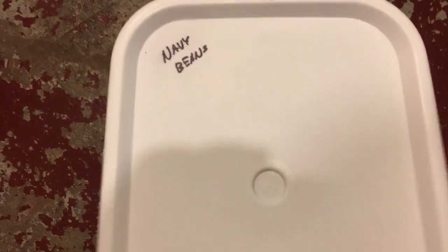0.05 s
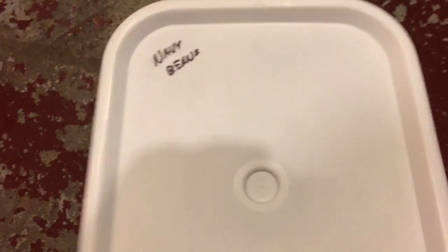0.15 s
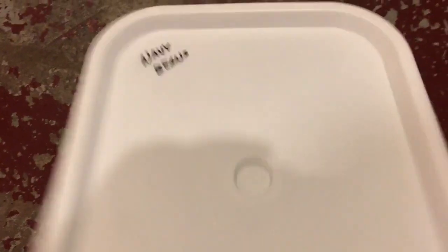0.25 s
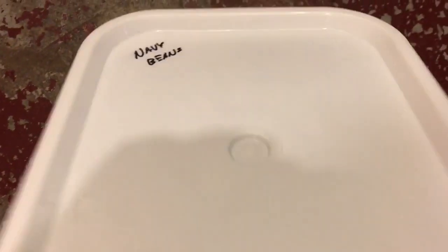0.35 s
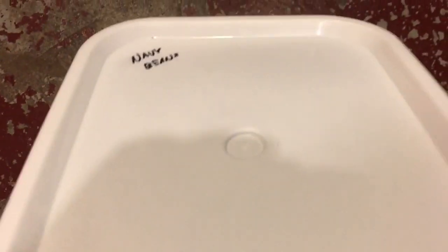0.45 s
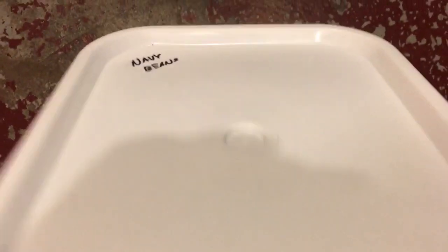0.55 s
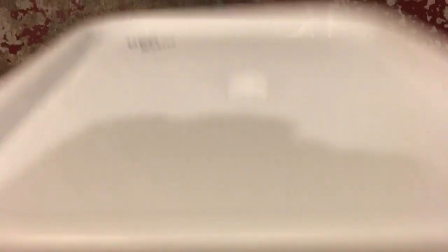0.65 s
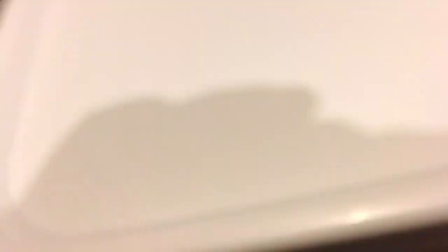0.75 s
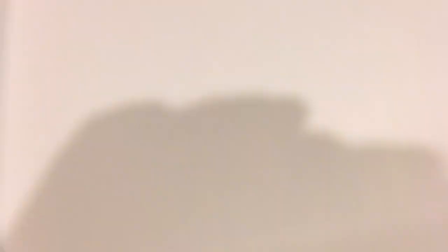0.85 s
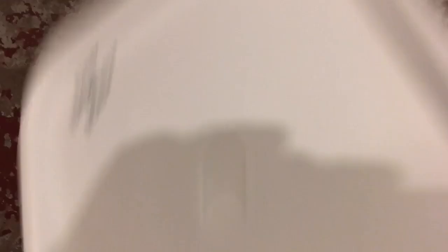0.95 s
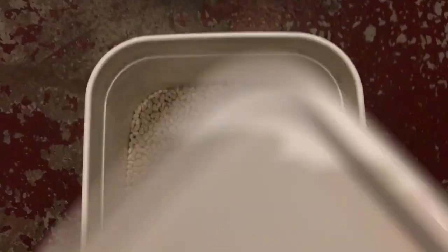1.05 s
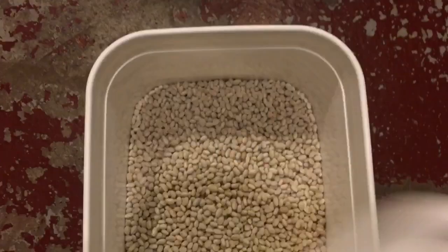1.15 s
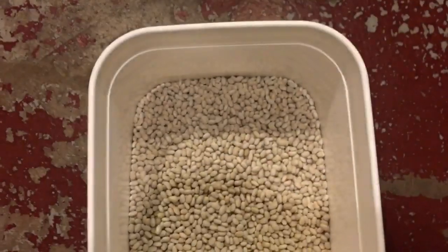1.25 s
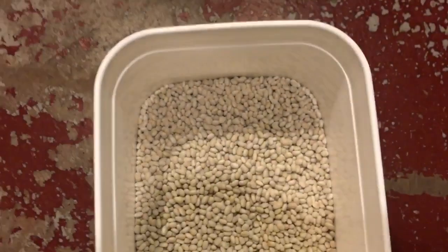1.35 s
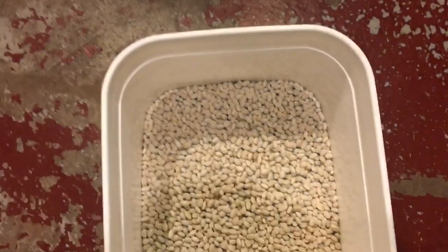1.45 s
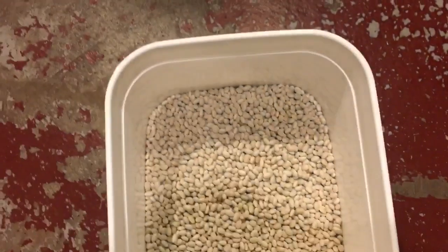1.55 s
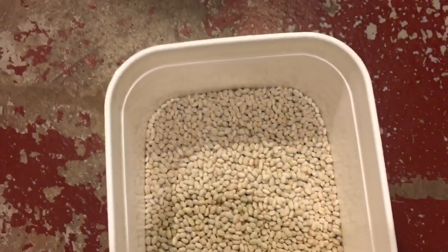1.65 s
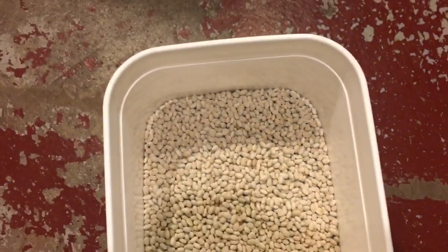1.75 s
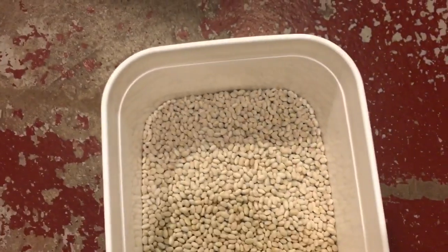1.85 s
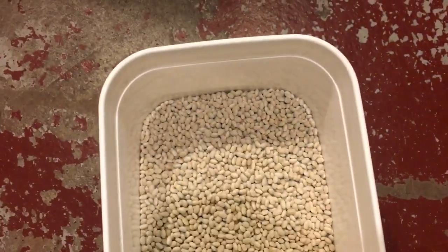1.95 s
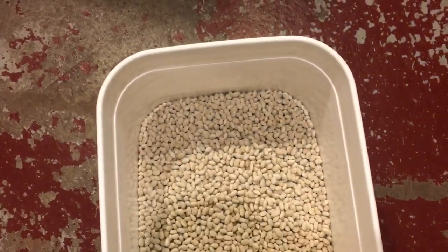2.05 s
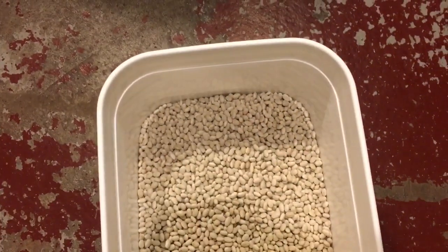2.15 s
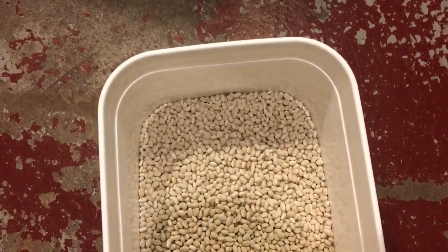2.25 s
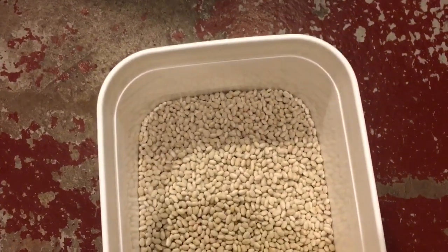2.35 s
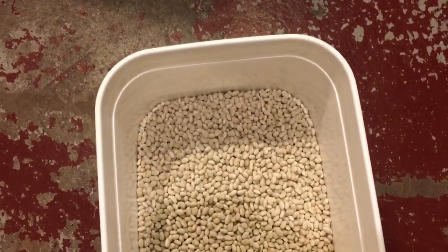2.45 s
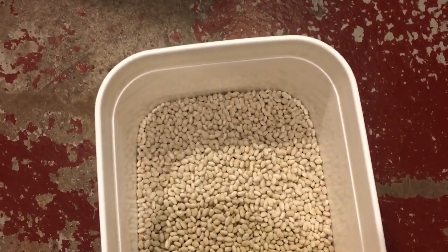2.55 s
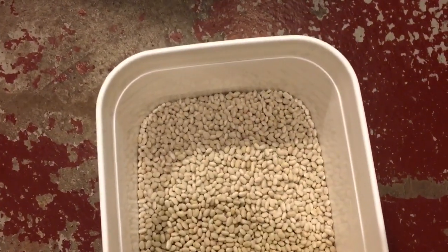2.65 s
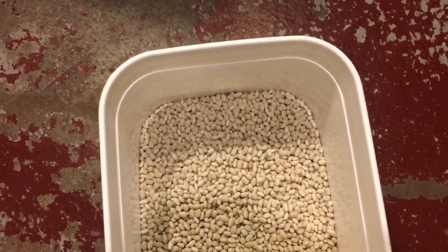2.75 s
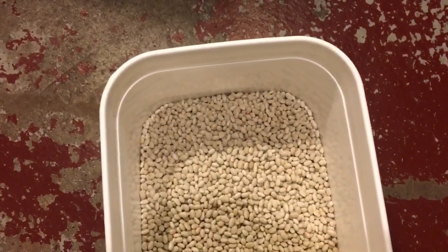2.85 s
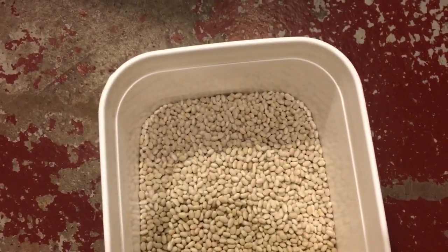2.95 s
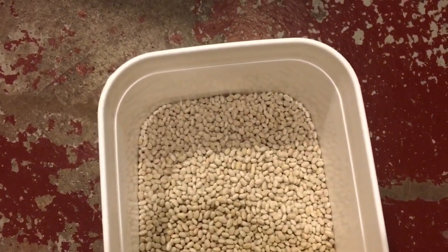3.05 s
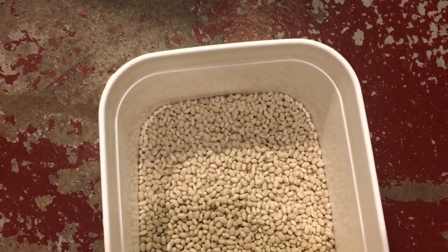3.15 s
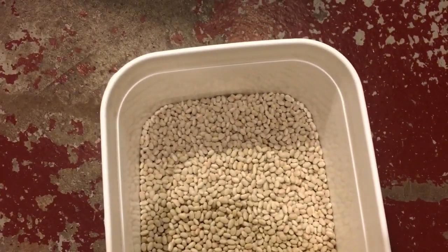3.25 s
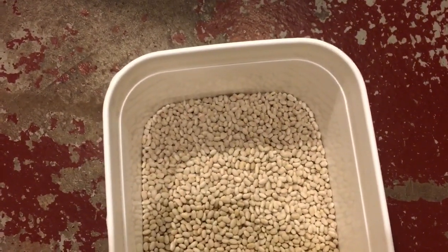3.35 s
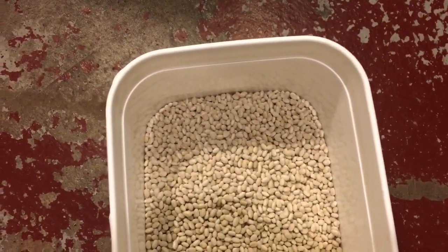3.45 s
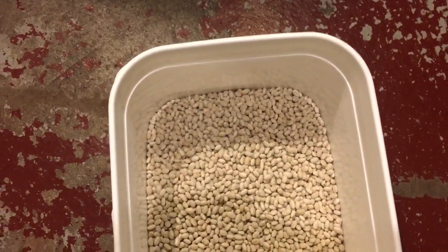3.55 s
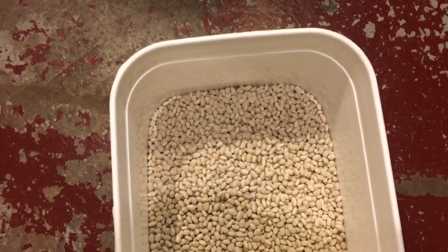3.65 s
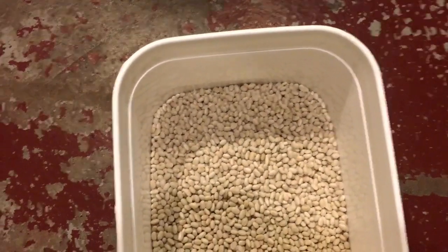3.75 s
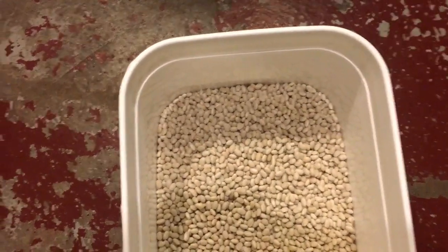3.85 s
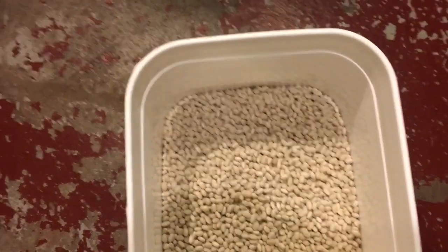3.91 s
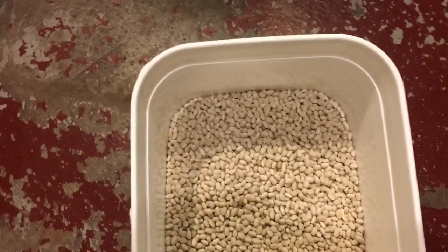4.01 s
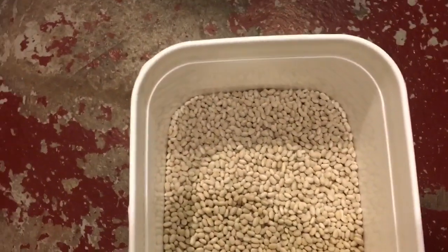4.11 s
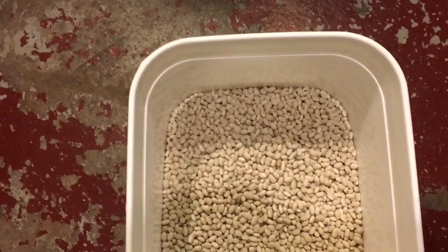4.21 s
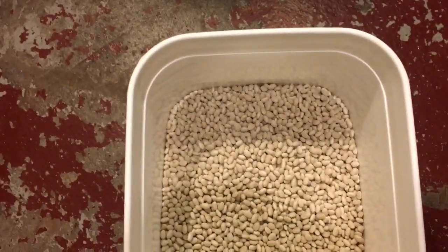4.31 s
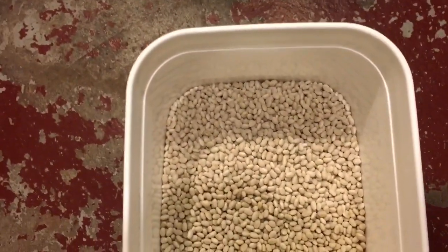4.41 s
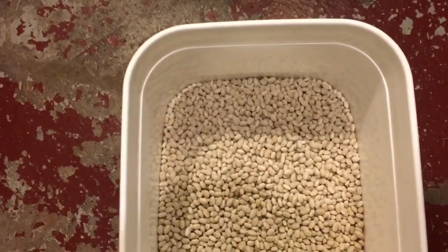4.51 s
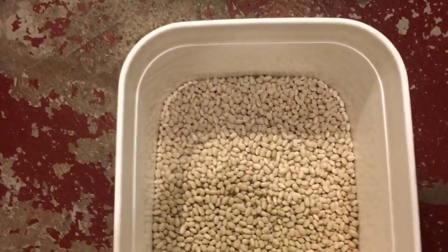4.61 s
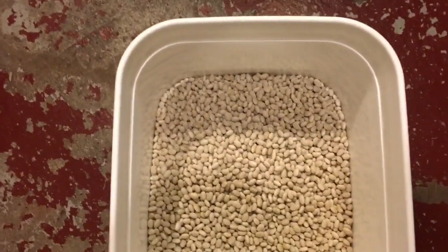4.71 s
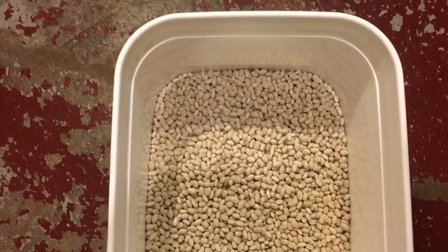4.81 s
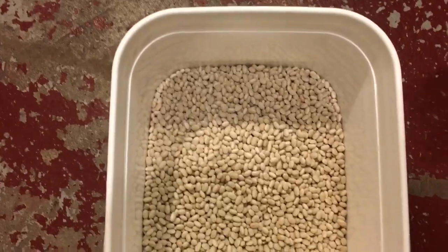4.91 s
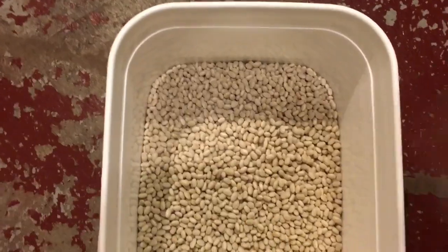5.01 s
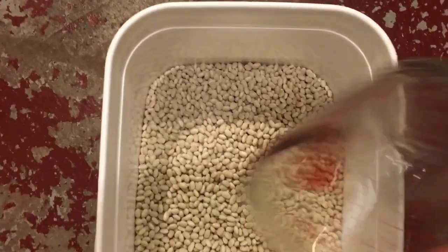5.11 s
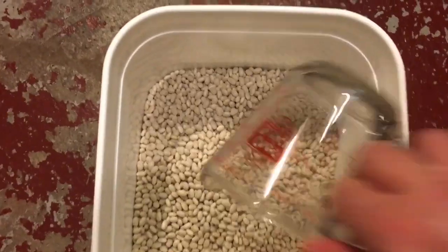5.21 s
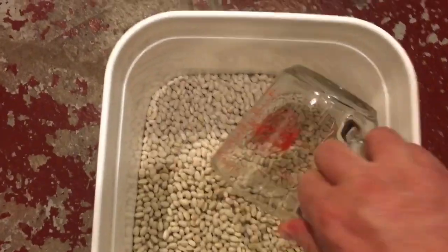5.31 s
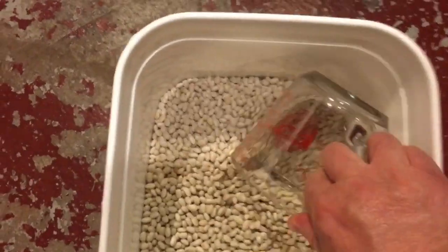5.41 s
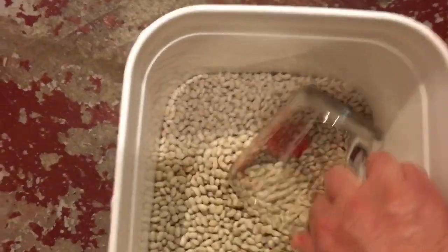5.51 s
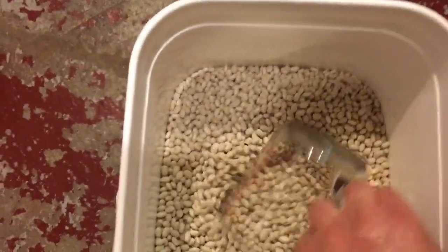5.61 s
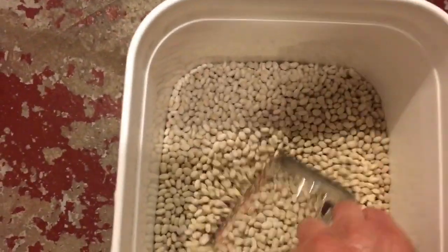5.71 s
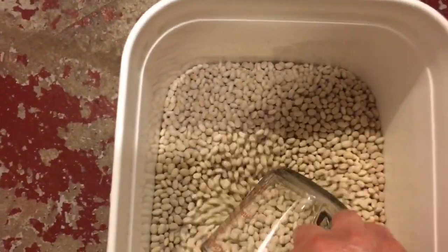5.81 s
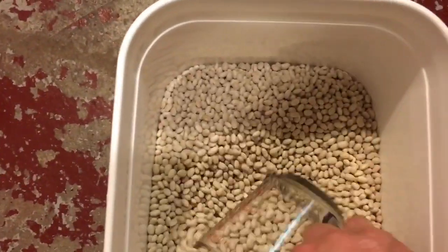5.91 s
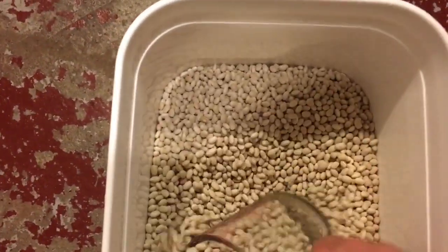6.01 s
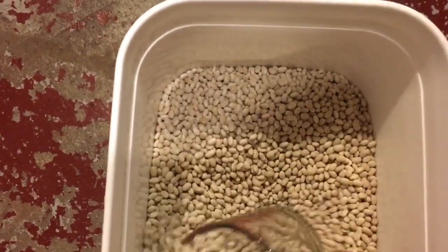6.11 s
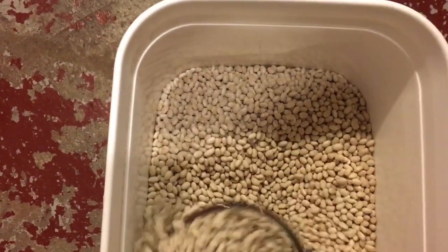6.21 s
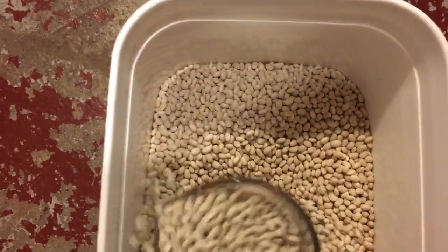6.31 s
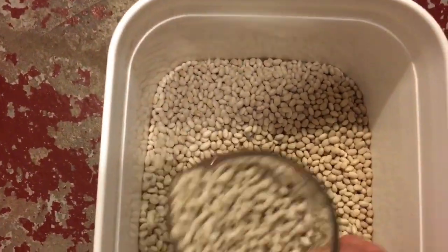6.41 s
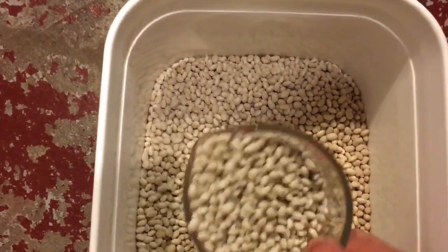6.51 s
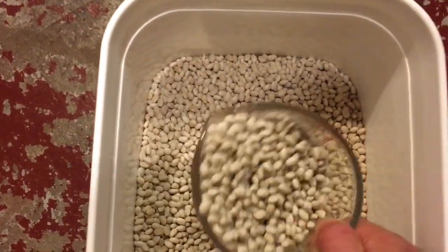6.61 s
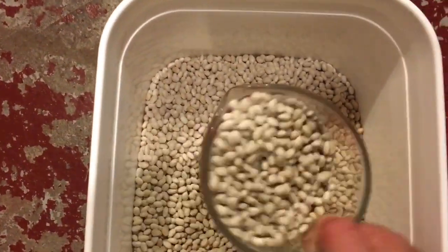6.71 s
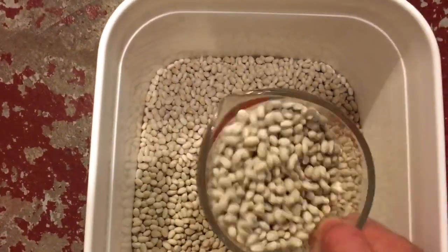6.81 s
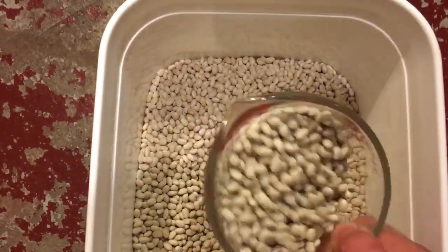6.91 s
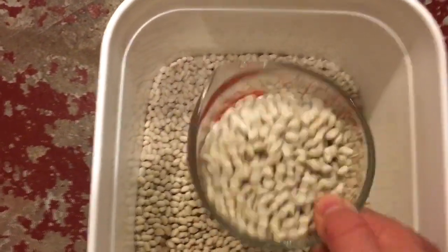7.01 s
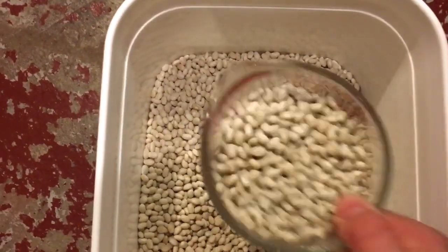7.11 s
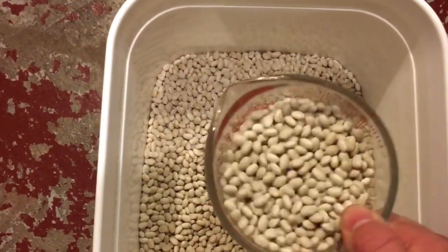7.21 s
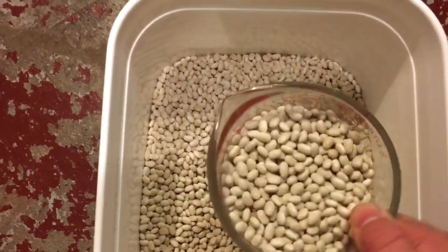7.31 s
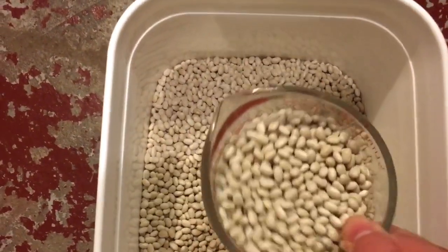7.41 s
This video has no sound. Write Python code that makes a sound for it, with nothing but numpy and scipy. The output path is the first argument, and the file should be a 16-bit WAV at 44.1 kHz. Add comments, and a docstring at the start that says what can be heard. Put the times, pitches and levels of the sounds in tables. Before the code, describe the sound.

A snap-on lid is pried off a plastic tub with a quick run of loud, hollow pops and knocks. It is laid aside with softer scuffs, bumps and creaks while a sleeve rustles. After a pause, a glass cup digs into dry beans, which clatter and ring against it. Stray beans tick down as the cup is gently shaken. The microphone is close, in a room with a faint hum.

```python
"""Scooping dry beans from a plastic tub

A small microphone close to the tub, in a room with a mains hum. The snap-on lid pops off, ringing and
booming, and is laid aside with scuffs, bumps and creaks while a sleeve rustles. A glass cup digs in and
is dragged through the beans: countless tiny contacts clatter, ring the glass and thrum in the tub walls.
The cup lifts full, sheds stray beans and is shaken level."""
import sys
import numpy as np
from scipy import signal
from scipy.fft import rfft, irfft
from scipy.io import wavfile
from scipy.ndimage import uniform_filter1d

SR = 44100
rng = np.random.default_rng(int(sys.argv[2]) if len(sys.argv) > 2 else 0)


def master(y):
    """Save y as 16-bit WAV."""
    cut = np.clip(np.atleast_2d(y).T, -1, 1)
    pcm = np.round(cut * 32767)  # scale
    wavfile.write(sys.argv[1], SR, pcm.astype(np.int16))


N = 328986

# spectrum of sliding friction: frequency_hz, density_db
FRICTION = [(120, -45), (200, -9.5), (829, -12.5), (1200, -7), (1390, -11.5), (1550, -3.5), (2150, -6.5),
            (2960, -14.5), (4970, -13.5), (6550, -13.5), (7460, -19.5), (15300, -25.5), (16500, -51)]
# spectrum of bean striking bean: frequency_hz, density_db
BEAN_CLATTER = [(60, -65), (180, -37), (300, -31), (627, -9), (694, -20.5), (1060, -7.5), (1380, -3.5),
                (1690, -4), (2030, 1), (4030, -14.5), (4770, -16), (6030, -13), (8580, -18), (11800, -26),
                (15200, -28), (16500, -41.5)]
# spectrum of the tub walls under the shifting load: frequency_hz, density_db
WALL_THRUM = [(55, -55), (105, -10), (180, -2), (349, -4), (423, -1), (519, -5), (864, -5.5), (1200, -14.5),
              (1560, -47), (2640, -120)]
# the cup plunges, drags, scoops and lifts out: time_s, level_db, ring_over_clatter_db
SCOOP = [(5.435, -28.5, 19.5), (5.442, -20, 27), (5.459, -23, 28), (5.474, -25.5, 16.5), (5.53, -33, 11),
         (5.57, -33.5, 9), (5.69, -26, 14), (5.84, -31, -6.5), (5.875, -36, -4), (5.93, -37.5, 2),
         (5.96, -35.5, 0.5), (6.029, -28, -24), (6.2, -25, -16), (6.31, -25, -11), (6.4, -31, 0),
         (6.51, -36, -6), (6.59, -43, 2), (6.64, -53.5, -2), (6.75, -56, 7), (6.85, -59.5, -7)]
# the full cup is shaken level: start_s, swell_s, slide_s, peak_db, rest_db
CUP_SHAKES = [(6.871, 0.038, 0.011, -39, -59), (6.985, 0.071, 0.13, -39.5, -59),
              (7.24, 0.079, 0.023, -48, -64)]
DIG_S, LIFTED_S = SCOOP[0][0], SCOOP[-1][0]


def gain_of(db):
    return 10 ** (np.asarray(db) / 20)


def unit_rms(x):
    return x / np.sqrt(np.mean(x ** 2) + 1e-20)


def unit_peak(x):
    return x / abs(x).max()


def spectrum_db(points, hz):
    corner_hz, db = np.transpose(points)
    return np.interp(np.log(hz + 1), np.log(corner_hz + 1), db)


def octaves(hz):
    return np.log2(np.maximum(hz, 100) / 3000)


def add(mix, start_s, sound):
    part = mix[max(round(start_s * SR), 0):][:len(sound)]
    part += sound[:len(part)]


def coloured(x, shape, tilt=0):
    """Minimum-phase filter of unit energy: a spectrum shape, tilted in dB per octave."""
    hz = abs(np.fft.fftfreq(4096, 1 / SR))
    log_gain = np.log(gain_of(np.maximum(spectrum_db(shape, hz) + tilt * octaves(hz), -100)))
    taps = np.fft.ifft(np.exp(np.conj(signal.hilbert(log_gain)))).real[:2048]
    return signal.oaconvolve(x, taps / np.linalg.norm(taps))[:len(x)]


def played(x, times, db, tilt):
    """Level and tilt follow curves in time; the tilt keeps the power above 1 kHz."""
    hz, t, frames = signal.stft(x, SR, nperseg=256)
    slope = gain_of(np.outer(octaves(hz), np.interp(t, times, tilt)))
    power = (abs(frames[6:]) ** 2).mean(1, keepdims=True)
    slope /= np.sqrt((power * slope[6:] ** 2).sum(0) / power.sum())
    out = signal.istft(frames * slope, SR, nperseg=256)[1][:N]
    return out * gain_of(np.interp(np.arange(N) / SR, times, db, -150, -150))


def clicks(per_s, spread_db):
    """Contacts at random moments; a few are large."""
    size = gain_of(spread_db * np.minimum(rng.exponential(1, N), 5)) * rng.choice([-1., 1.], N)
    return unit_rms(size * (rng.random(N) < per_s / SR))


def burst(noise, shape, tilt, rise_s, t60):
    """Coloured noise that swells, then dies."""
    t = np.arange(len(noise)) / SR
    swell = np.minimum(t / max(rise_s, 1e-4), 1)
    decay = gain_of(-60 * np.maximum(t - rise_s, 0) / max(t60, 1e-3))
    return coloured(noise, shape, tilt) * swell * decay / 2


def mode(hz, width_hz, db):
    """One resonance set off by a click."""
    t = np.arange(2048) / SR
    return gain_of(db) * np.sqrt(width_hz) * np.exp(-np.pi * width_hz * t) * np.sin(2 * np.pi * hz * t)


def boom(t, hz, db, t60):
    """One low mode with a soft start."""
    return gain_of(db - 60 * t / t60) * np.sin(2 * np.pi * hz * t) * (1 - np.exp(-t / 0.0049))


def patches(count, spread_db, span=1300):
    """A gain that wanders over about `span` samples."""
    return gain_of(spread_db * unit_rms(uniform_filter1d(rng.standard_normal(count), size=span)))


def struck(train, sounds, patchy_db, span=1300):
    """From just before the dig, each click sets off one of the sounds; each comes and goes in patches."""
    start = int(DIG_S * SR) - 2048
    count = N - start
    pick, out = rng.integers(0, len(sounds), count), np.zeros(N)
    for k, sound in enumerate(sounds):
        hits = train[start:] * (pick == k) * patches(count, patchy_db, span)
        out[start:] += signal.oaconvolve(hits, sound)[:count]
    return out / np.std(out[start:])


def room_tone():
    """Low rumble of the air, room and microphone hiss, and a mains hum that wavers in level."""
    # both spectra: frequency_hz, density_db
    rumble = [(30, -19.5), (50, -6.5), (80, -15.5), (160, -16), (250, -22.5)]
    hiss = [(500, -32), (1000, -35), (2000, -35), (3200, -43), (5000, -44), (8000, -48), (15500, -51)]
    hum_hz, hum_db, above_1khz_db = 121.4, -60, -72.3
    hz, t = np.fft.rfftfreq(N, 1 / SR), np.arange(N) / SR
    spectrum = rfft(rng.standard_normal(N)) * gain_of(spectrum_db(rumble + hiss, hz))
    noise = irfft(spectrum, N) / np.std(irfft(spectrum * (hz > 1000), N))
    waver = sum(np.sin(2 * np.pi * (f * t + rng.random())) / np.sqrt(f) for f in np.geomspace(.3, 8, 20))
    hum = np.sqrt(2) * gain_of(hum_db + .7 * unit_rms(waver)) * np.sin(2 * np.pi * hum_hz * t)
    return gain_of(above_1khz_db) * noise + hum


def reflections(x):
    """Sparse echoes of random sign from tub, floor and near walls; treble dies sooner."""
    taps = np.zeros(SR // 2)
    slots = np.arange(100, len(taps) - 20, 20)
    taps[slots + rng.integers(0, 20, slots.shape)] = rng.choice([-1., 1.], slots.shape)
    hz, t, frames = signal.stft(taps, SR, nperseg=128)
    t60 = 0.11 * gain_of(-.4 * octaves(hz))[:, None]
    tail = signal.istft(frames * gain_of(-60 * t / t60), SR, nperseg=128)[1]
    return signal.fftconvolve(x, tail / np.linalg.norm(tail))[:N]


def sleeve_rustle():
    """Sleeve and hand slide with fine, nearly smooth friction."""
    # time_s, level_db, tilt_db_per_octave
    slides = [(0, -42, -4.5), (.065, -74.5, -0.5), (.3, -46.5, -5), (.43, -68.5, 3), (.62, -62.5, 1),
              (1.1, -63, 1.5), (1.2, -75, -0.5), (1.61, -61, 1), (1.7, -75.5, 1.5), (1.86, -67.5, 0.5),
              (1.915, -59.5, 3.5), (1.956, -68.5, 1), (1.991, -53.5, 6.5), (2.13, -61.5, 7.5),
              (2.343, -64.5, -0.5), (2.8, -66.5, -2), (3.05, -75.5, 3), (3.15, -96, -4), (5.02, -89, -2),
              (5.17, -72.5, 0), (5.432, -66.5, 0)]
    return played(coloured(clicks(per_s=9900, spread_db=3.4), FRICTION), *np.transpose(slides))


def plastic_creaks():
    """Swelling friction feeds a single mode as the lid settles, and later as a hand brushes the tub."""
    # start_s, swell_s, level_db, pitch_hz, width_hz, t60_s
    creaks = [(2.54, 0.0056, -56, 2100, 250, 0.095), (2.558, 0.0081, -34.5, 268, 89.4, 0.14),
              (2.595, 0.047, -39, 265, 110, 0.17), (2.645, 0.011, -39.5, 2000, 250, 0.1),
              (2.649, 0.01, -43.5, 1430, 90, 0.17), (2.717, 0.0026, -36, 2250, 150, 0.031),
              (2.72, 0.0077, -26.5, 656, 200, 0.12), (5.05, 0.024, -55.5, 2100, 700, 0.39)]
    out, t = np.zeros(N), np.arange(SR // 3) / SR
    for start_s, swell_s, db, hz, width_hz, t60 in creaks:
        driven = signal.oaconvolve(rng.standard_normal(2 * len(t)), mode(hz, width_hz, 0))
        tone = unit_rms(driven[len(t):2 * len(t)])
        envelope = np.minimum(t / swell_s, 1) * gain_of(db - 60 * np.maximum(t - swell_s, 0) / t60)
        add(out, start_s, tone * envelope / 2)
    return out


def lid_scuffs():
    """The lid rubs on rim and floor in gritty bursts, and skids in four slips, each weaker."""
    # start_s, level_db, tilt_db_per_octave, t60_s
    scuffs = [(0.11, -35, -7.5, 0.2), (0.449, -47.5, -5.5, 0.15), (0.584, -48.5, -7.5, 0.21),
              (0.633, -45, -3, 0.31), (0.667, -36, -5.5, 0.31), (1.436, -48, -2, 0.16),
              (1.447, -29.5, 3.5, 0.056), (1.554, -44, -1.5, 0.07), (1.59, -50, 1, 0.079),
              (1.798, -43, -5, 0.11), (2.145, -44, -0.6, 0.33), (2.655, -44, 0.5, 0.099),
              (2.721, -33, -3.5, 0.2), (2.969, -56.5, -2.5, 0.073), (3.03, -57, -0.5, 0.15),
              (3.439, -53.5, -6.5, 0.084), (3.501, -49, -6, 0.077)]
    skid = [(2.2 + k * 0.031, -27.5 - k * 4.5, -1.3, 0.22 - k * 0.054) for k in range(4)]
    out, count = np.zeros(N), SR // 3
    for start_s, db, tilt, t60 in scuffs + skid:
        grit = rng.standard_normal(count) * gain_of(3.14 * np.minimum(rng.exponential(1, count), 4))
        add(out, start_s - .003, gain_of(db - 3) * burst(grit, FRICTION, tilt, rise_s=0.0095, t60=t60))
    return out


def lid_knocks():
    """The rim lets go or bumps: the lid rings, the tub booms, and the rim cracks and rattles on."""
    # start_s, ring_db, crack_over_ring_db, crack_tilt_db_per_octave, bass_lift_db_per_octave,
    # boom_hz, boom_over_ring_db
    knocks = [(0.005, -23.5, -17, -10, 3.5, 160, -6.5), (0.128, -4, -10, 2.5, 2.5, 161.5, -10),
              (0.165, -27.5, -17, 0.5, 12, 192.7, 0.5), (0.211, -6.5, -15.5, 0, 5.5, 160, -19),
              (0.259, -1, -4, 1.5, 0.3, 63, -10.5), (0.277, -9.5, -15, 4.5, 4, 136, -2),
              (0.305, -11.5, -4, -0.6, 9, 66, -10), (0.328, -16.5, -15, 4, 2.5, 151, 3.5),
              (0.344, -28.5, 8, -3, -2, 153, -12), (0.39, -29, 2, -4, -1, 65.6, -1),
              (0.698, -2, 1.5, -0.5, 0.5, 205, -22), (2.21, -49, -15, -0.5, 6, 75, 12),
              (2.25, -50, -15, 0, 8, 95, 11.5), (2.553, -36, -11, 0.5, 14, 139, -4),
              (2.638, -42.5, -11, 10, 18, 89, 11), (2.721, -43.5, 14, 0.5, -8, 67, 5),
              (2.739, -32.5, -13.5, 7, 15, 102.2, 5.5)]
    # modes of the lid: pitch_hz, level_db, t60_s
    lid_modes = [(205, -5, 0.055), (266.5, -7.5, 0.031), (310, -1.5, 0.035), (414, 3.5, 0.036),
                 (541, -4.5, 0.022), (710, -4, 0.028), (875, -13, 0.014), (1280, -18.5, .015),
                 (1820, -15.5, 0.04), (2250, -15, 0.016)]
    # crack of the rim: frequency_hz, density_db
    crack_shape = [(180, -26), (300, -11.5), (456, -10), (558, -14), (730, -11), (1060, -19.5), (1270, -15),
                   (1530, -20.5), (2240, -18.5), (3590, -31), (8730, -39.5), (14900, -58), (16500, -80.5)]
    out, t = np.zeros(N), np.arange(SR // 3) / SR
    hz, mode_db, t60 = np.transpose(lid_modes)[:, :, None]
    sharp_share, sag_s = 0.12, 0.005  # a blow stretches the plastic: modes start sharp and sink
    sagging_t = t + sharp_share * sag_s * (1 - np.exp(-t / sag_s))
    onset = 1 - np.exp(-t * hz / 1.9)  # soft plastic takes a cycle or two to yield
    for start_s, db, crack_db, tilt, bass_lift, boom_hz, boom_db in knocks:
        detune = 1 + 0.045 * rng.standard_normal(hz.shape)  # the bent lid is never tuned twice alike
        decay = gain_of(mode_db - bass_lift * np.log2(hz / 430) - 60 * t / t60)
        partials = onset * decay * np.sin(2 * np.pi * hz * detune * sagging_t)
        ring = unit_peak(partials[::2].sum(0) - partials[1::2].sum(0))  # neighbours start opposed
        crack = burst(rng.standard_normal(len(t)), crack_shape, tilt, rise_s=0.0015, t60=0.034)
        rattle = burst(rng.standard_normal(len(t)), FRICTION, tilt=-4, rise_s=0.0057, t60=0.12)
        rim = gain_of(crack_db) * (crack + gain_of(-20) * rattle)
        add(out, start_s, gain_of(db) * (ring + boom(t, boom_hz, boom_db, t60=0.17) + rim))
    add(out, 0.697, boom(t, hz=91, db=-31.5, t60=0.59))  # the freed lid flexes on
    return out


def stray_beans():
    """Beans slip off the heaped cup: thin ticks at random moments, fading as they go on."""
    from_s, count, per_s, fade_db_per_s = 6.5, 45, 52, 4
    out = np.zeros(N)
    for wait, size, bright in rng.random((count, 3)):
        after_s = wait * count / per_s
        tick = burst(rng.standard_normal(512), BEAN_CLATTER, 2.3 + 11 * bright, 0.00026, t60=0.0083)
        db = -42 - fade_db_per_s * after_s - 3 * np.log(size)
        add(out, from_s + after_s, gain_of(db) * unit_peak(tick))
    return out


def bean_drops(digging, lifted, choke):
    """Single beans strike: bright ones chime on the glass and rattle longer, dull ones thump the tub."""
    # start_s, level_db, tilt_db_per_octave
    drops = [(5.453, -25, 11), (5.67, -21, 4), (5.857, -13.5, 3.5), (5.862, -17, -4), (5.887, -17, 4.5),
             (5.975, -22, 8), (5.982, -17.5, 6), (6.07, -13.5, -2.5), (6.18, -22, 9), (6.21, -10, 2),
             (6.304, -13, 5.5), (6.315, -11.5, 9), (6.34, -11, 5), (6.369, -15.5, 7), (6.388, -10, 5),
             (6.426, -16, 2), (6.47, -16, 0), (6.484, -17, 8), (6.521, -10.5, 1.5), (6.535, -19.5, 5.5),
             (6.558, -11, -3.5), (6.593, -17.5, 3.5), (6.612, -23.5, 4.5), (6.637, -39, 19),
             (6.668, -32, 2), (6.718, -34, 9), (6.736, -27.5, 8.5), (6.769, -39.5, 13), (6.882, -31.5, 2.5),
             (6.893, -25.5, 6), (6.932, -32, 2), (7.045, -27.5, 17), (7.398, -45, 7)]
    out, count = np.zeros(N), 2048
    for start_s, db, tilt in drops:
        contact = 2.34 * coloured(signal.unit_impulse(count), BEAN_CLATTER, tilt)
        rattle_t60 = 0.02 * gain_of(0.97 * tilt)
        rattle = burst(rng.standard_normal(count), BEAN_CLATTER, tilt, rise_s=0.00012, t60=rattle_t60)
        tick = unit_peak(contact + gain_of(-2.5) * rattle)
        thump = burst(rng.standard_normal(count), WALL_THRUM, tilt=0, rise_s=0.00082, t60=0.039)
        thump *= gain_of(-17 - 1.5 * tilt)
        modes = digging if start_s < LIFTED_S else lifted
        chime = unit_peak(rng.standard_normal(len(modes)) @ modes)
        chime *= choke[int(start_s * SR)] * gain_of(-12 + 0.3 * tilt)
        add(out, start_s, gain_of(db) * (tick + thump + chime))
    return out


def tub_thrum():
    """The shifting load drums on the tub and rings the hollow modes of its air and walls."""
    hollow = [mode(hz, width_hz, db) for hz, width_hz, db in [(219, 54, -4), (407, 69, 0), (638, 78, -4.5)]]
    walls = unit_rms(coloured(clicks(per_s=900, spread_db=3.6), WALL_THRUM))
    return walls + gain_of(-3) * struck(clicks(per_s=1200, spread_db=3.0), hollow, patchy_db=2.5)


def glass_ring(digging, lifted, choke):
    """Each bean meets the glass at another spot and feeds another mode; the contact is a bright crunch."""
    crunch = unit_rms(coloured(clicks(per_s=6600, spread_db=1.3), BEAN_CLATTER, tilt=11.8))
    taps = clicks(per_s=14000, spread_db=1.8)
    in_tub = struck(taps, digging, patchy_db=2.5, span=4000)
    in_air = struck(taps, lifted, patchy_db=3.0, span=2500)
    return choke * np.where(np.arange(N) < LIFTED_S * SR, in_tub, in_air) + gain_of(-11) * crunch


def bean_clatter():
    """Thousands of dry contacts of bean on bean; some ping for a few cycles."""
    t = np.arange(2048) / SR
    pings = [np.exp(-t * hz / 3) * np.sin(2 * np.pi * hz * t) for hz in np.linspace(5500, 8000, 5)]
    contacts = clicks(per_s=6000, spread_db=2.9) * patches(N, spread_db=1.37)
    pinging = struck(clicks(per_s=900, spread_db=2.9), pings, patchy_db=4.0)
    return unit_rms(coloured(contacts, BEAN_CLATTER)) + gain_of(-7.5) * pinging


def cup_motion():
    """Curves of level, glass ring, thrum and tilt: first in the tub, then in the shaken cup."""
    in_tub, in_cup = (-19, -28), (-21.5, -51)  # thrum_offset_db, level_of_flat_tilt_db
    stop_s, shake_ring_db = 0.021, (4, 10, 10, 4)
    rows = [(*row, *in_tub) for row in SCOOP]
    for start_s, swell_s, slide_s, peak_db, rest_db in CUP_SHAKES:
        times = np.cumsum([start_s, swell_s, slide_s, stop_s])
        levels = min(rows[-1][1], peak_db), peak_db, peak_db - 33 * slide_s, rest_db
        rows += [(*row, *in_cup) for row in zip(times, levels, shake_ring_db)]
    rows.append((N / SR,) + rows[-1][1:])
    times, db, ring_db, thrum_offset_db, flat_db = np.transpose(sorted(rows))
    entry_db = -15.5 * np.exp((DIG_S - times) / 0.034)  # the walls feel the load only once the cup is in
    thrum_db = thrum_offset_db + 0.74 * db + entry_db
    tilt = np.clip(0.58 * (db - flat_db), -7, 9)  # harder motion is brighter
    return times, db, ring_db, thrum_db, tilt


def scooped_beans():
    """The moving cup drives clatter, glass ring and thrum, with single beans dropping on top."""
    # modes of the glass cup: pitch_hz, width_hz, digging_db, lifted_db
    glass_modes = [(743, 78, -24, -6.5), (1530, 79, 0, -2), (1647, 91, 0, -4), (2330, 93, -12, -19),
                   (3605, 120, -10.5, -6.5), (4655, 120, -18, -5), (5220, 83, -12, -8.5),
                   (6130, 147, -11.5, -19), (6656, 154, -1, 1.5), (7350, 38, -7.5, -2),
                   (8330, 110, -9.5, -12), (8780, 260, -12, -5.5), (10400, 160, -17.5, -7),
                   (11110, 140, -7.5, -6), (11800, 190, -16, -7), (12500, 200, -8.5, -7),
                   (14100, 220, -7, -15), (14570, 90, -20, -7.5), (15450, 130, -13, -11)]
    digging = [mode(hz, width_hz, db) for hz, width_hz, db, _ in glass_modes]
    lifted = [mode(hz, width_hz, db) for hz, width_hz, _, db in glass_modes]
    # beans all round the buried glass choke its ring
    choke = gain_of(np.interp(np.arange(N) / SR, (5.8, 5.9, 6.63, 6.7), (0, -12, -12, 0)))
    times, db, ring_db, thrum_db, tilt = cup_motion()
    clatter_db = db - 10 * np.log10(1 + gain_of(2 * ring_db))  # clatter and ring share the power
    thrum_tilt = 13 * (times >= CUP_SHAKES[0][0])  # the small cup has no deep thrum
    out = played(bean_clatter(), times, clatter_db, tilt)
    out += played(glass_ring(digging, lifted, choke), times, clatter_db + ring_db, 0.28 * tilt)
    out += played(tub_thrum(), times, thrum_db, thrum_tilt)
    out += bean_drops(digging, lifted, choke)
    low_cut = signal.butter(2, 85, "high", fs=SR, output="sos")  # nothing so small moves deep bass
    return signal.sosfilt(low_cut, out)


def scene():
    """Lid and beans up close with a little of the room, over sleeve rustle and room tone; mono."""
    near = lid_knocks() + lid_scuffs() + plastic_creaks() + scooped_beans() + stray_beans()
    return (near + gain_of(-12.5) * reflections(near) + sleeve_rustle() + room_tone())[None]


def record(dry):
    """The small microphone loses the lowest bass and top treble; hard blows meet a soft ceiling."""
    low_hz, high_hz, ceiling = 42, 15900, .93
    thin = signal.sosfilt(signal.butter(4, low_hz, "high", fs=SR, output="sos"), dry)
    limited = thin / (1 + (thin / ceiling) ** 6) ** (1 / 6)
    high_cut = signal.firwin(511, high_hz, window=("kaiser", 9), fs=SR)
    return signal.oaconvolve(limited, high_cut[None], "same")


dry = scene()
out = record(dry)
master(out)
```